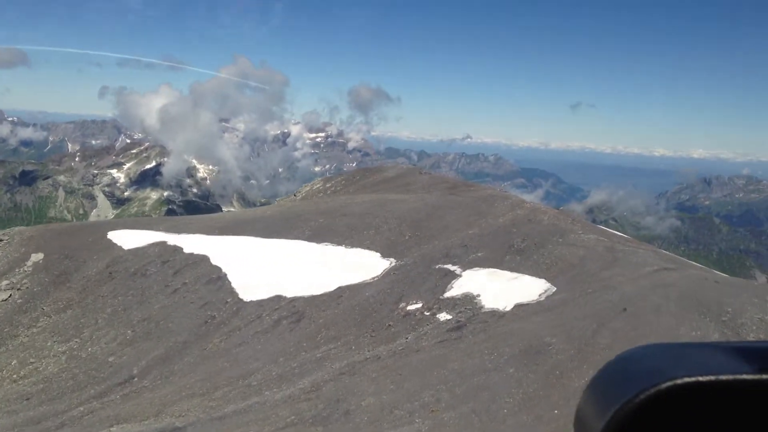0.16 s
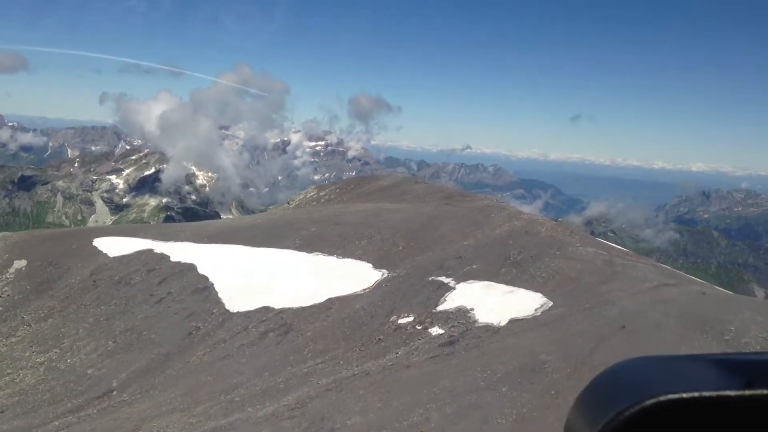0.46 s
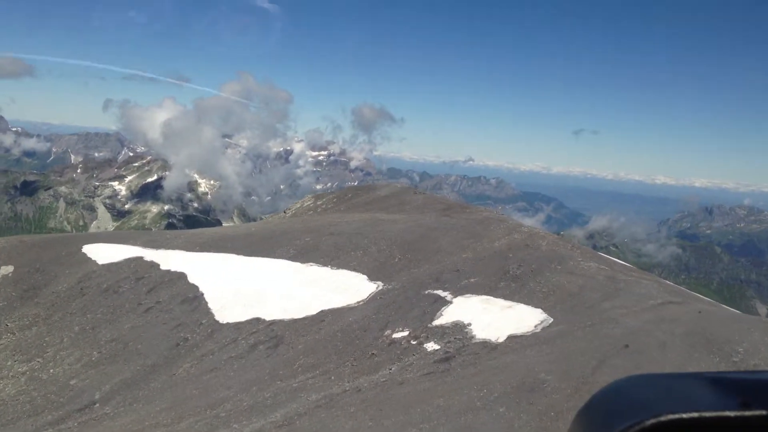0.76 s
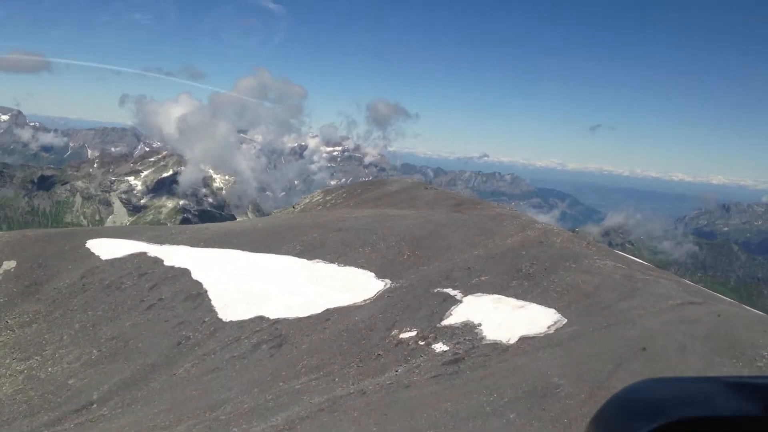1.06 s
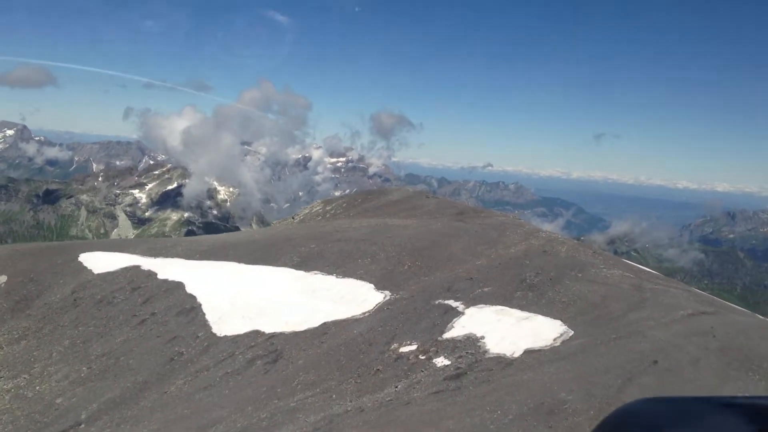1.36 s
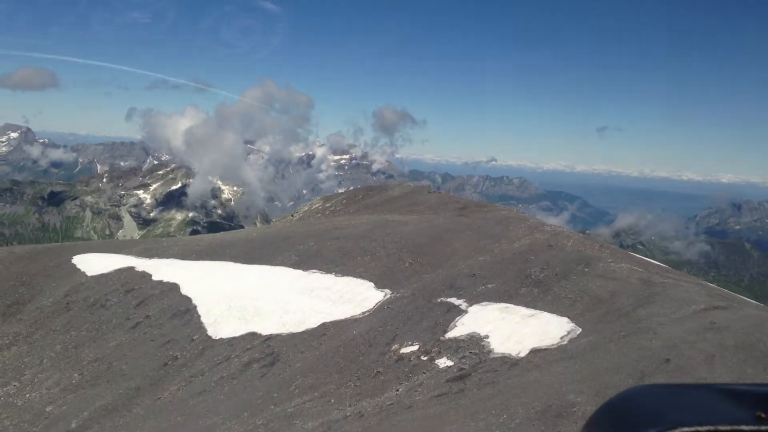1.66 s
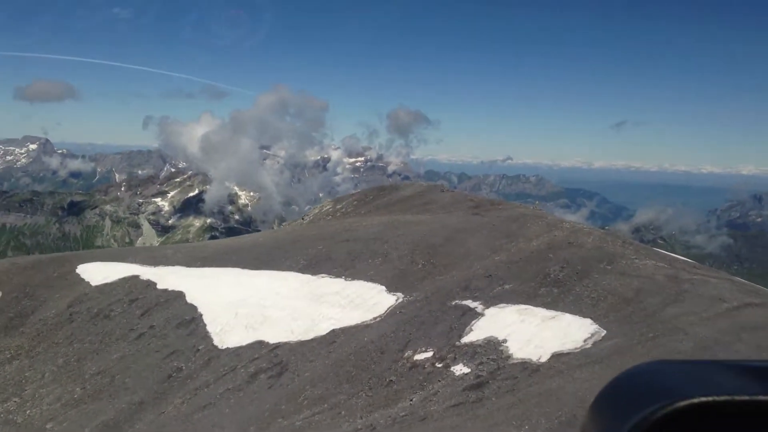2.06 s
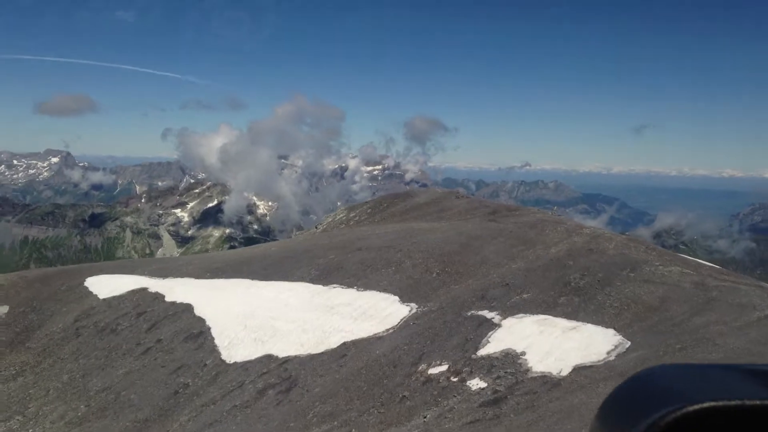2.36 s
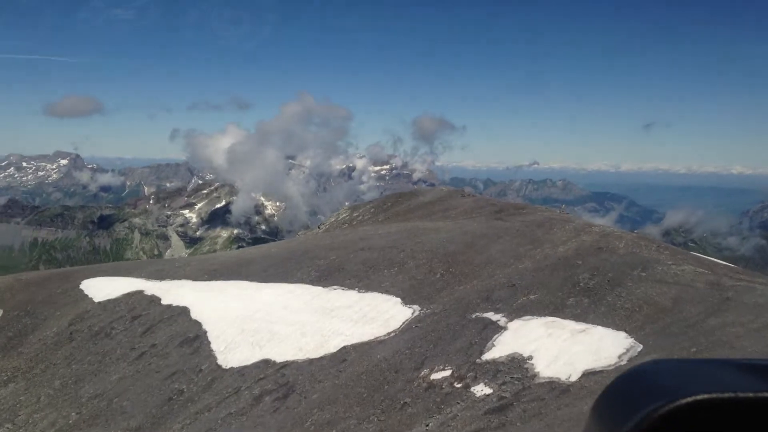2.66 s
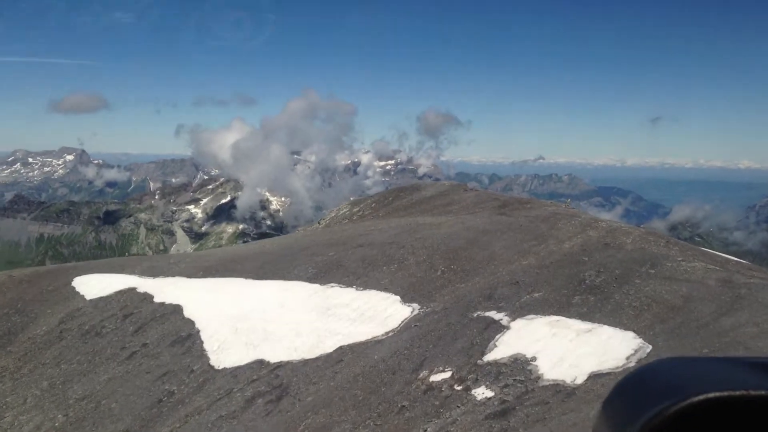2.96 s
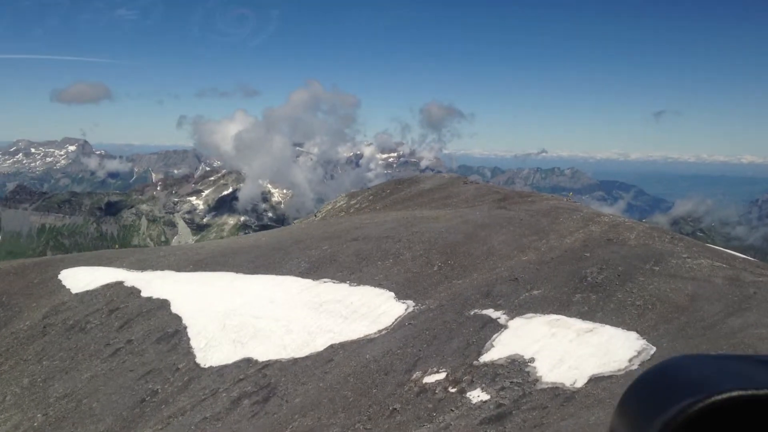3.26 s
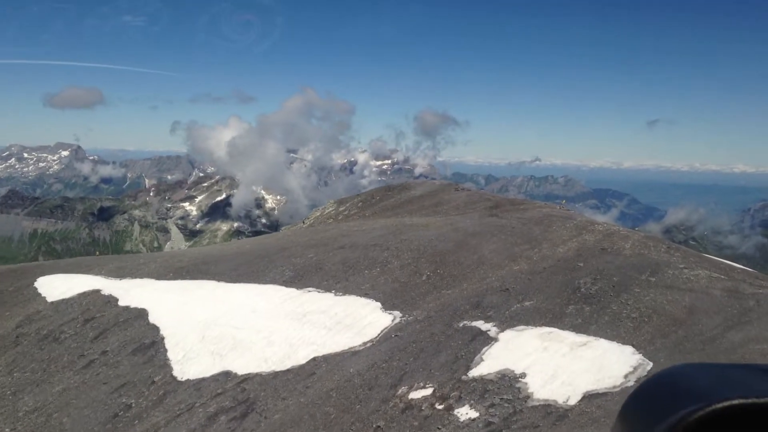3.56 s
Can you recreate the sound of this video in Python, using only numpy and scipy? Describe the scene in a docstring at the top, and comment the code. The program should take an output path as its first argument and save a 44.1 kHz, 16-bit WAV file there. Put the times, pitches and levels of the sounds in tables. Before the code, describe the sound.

Inside a flying helicopter: low engine drone, pulsing air rush and spells of chopping rotor slap

```python
"""Inside the cabin of a small piston helicopter in flight.
From the start the six-cylinder engine drones, gears whine faintly and the air rushes, swelling at every blade pass.
At once a first spell of blade slaps begins, about a second long: blades cut vortices and ring the cabin.
Dull thumps come now and then. From 1.9 s to 3 s a second spell of slaps builds quickly and fades;
its hardest slaps make the recorder duck, and drone and rush carry on to the end."""
import sys
import numpy as np
from scipy import signal
from scipy.io import wavfile
from scipy.ndimage import uniform_filter1d

SR = 44100
rng = np.random.default_rng(int(sys.argv[2]) if len(sys.argv) > 2 else 0)


def transcribe(u):
    """Save the signal u as a 16-bit wav file named by the first command-line argument.

    u: samples, shape (n,) or (channels, n), limited to [-1, 1]; the rate is SR.
    q: integer samples, one column per channel.
    """
    v = np.clip(np.atleast_2d(u).T, -1, 1)
    q = np.round(v * 32767).astype(np.int16)
    wavfile.write(sys.argv[1], SR, q)


N = 164493

# engine speed: (time [s], firing rate [firings per second])
FIRING_RATE = [(0, 136.05), (.8, 136.1), (1.2, 136.38), (2.15, 136.33), (2.4, 136.9), (3.0, 136.95),
               (3.25, 136.4), (3.73, 136.3)]
CYLINDERS = 6
# strength of the whole engine drone: (time [s], level [dB])
DRONE_LEVEL = [(0, -7), (.3, -0.9), (.6, 0), (1.0, -.5), (1.35, 0.5), (1.9, 1.5), (2.15, -2), (2.45, -4),
               (2.9, -2.5), (3.2, -2.5), (3.5, 1), (3.73, -0.8)]
# engine orders: (multiple of the four-stroke cycle rate, level before the drone curve [dB rms])
ENGINE_ORDERS = [(6, -17.5), (7, -31), (8, -23.5), (9, -25.5), (10, -26), (11, -36), (12, -30), (13, -39),
                 (15, -41), (16, -38.5), (17, -30), (18, -36.5), (21, -52), (27, -41.5), (28, -47),
                 (36, -53.5), (48, -44), (51, -48), (54, -50), (57, -57), (68, -56), (78, -55.5), (81, -66),
                 (102, -60), (108, -61)]
ORDER_SCATTER_RAD = 1  # how loosely the orders bunch in a cycle
FIRING_FLUTTER, ORDER_FLUTTER = 0.13, 0.25  # unsteadiness, relative to the tone
FLUTTER_HZ = 6.4
DRONE_CHOP_DB = 0.5  # the blades chop the drone slightly, this much either way

# gear whine: (frequency at mean engine speed [Hz], level before GEAR_LIFT_DB [dB rms])
GEAR_WHINES = [(5335, -72), (5545, -68), (6772, -71), (8210, -91), (8500, -84), (8619, -72)]
GEAR_LIFT_DB, GEAR_FLUTTER = 3, 0.4

BLADE_HZ, FIRST_SWISH_S = 13.62, 0.076
# colour of rushing air and machinery: (frequency [Hz], relative density [dB per Hz])
RUSH_SPECTRUM = [(25, -38), (60, -36), (100, -10), (150, -4.5), (200, -2.1), (260, -5.5), (330, -8.5),
                 (410, -7.5), (520, -14.5), (700, -16.5), (900, -20), (1150, -20), (1500, -28.5),
                 (2000, -29), (2500, -30.5), (4000, -36), (6500, -41.5), (8000, -43.5), (10000, -52.5),
                 (12500, -49.5), (15000, -57.5)]
RUSH_DB = -24.5  # rms before the level curve
# level of the rush: (time [s], level [dB])
RUSH_LEVEL = [(0, -2), (.4, -0.13), (.8, 0.4), (1.3, 1), (1.95, 3), (2.3, 0), (2.8, -0.4), (3.2, -0.9),
              (3.73, 0.7)]
# swell of the rush at each blade pass: (frequency [Hz], swing either way [dB])
BLADE_SWELL = [(100, 3.2), (300, 2.5), (700, 1), (2000, 1), (4500, 1.2), (8000, 2.5), (12000, 3)]

# blade slaps: (time [s], strength [dB], low-pass edge [Hz], extra level of side crossings and whop [dB])
BLADE_SLAPS = [(.058, 0, 940, -2.5), (.139, -5.5, 2180, -1), (0.214, -5.5, 2000, -5.5), (.281, 1, 890, -4),
               (0.349, 1.5, 970, -2.5), (.425, -4, 810, 4), (.502, -1.5, 780, 1.5), (.571, 0.5, 950, 0),
               (.646, 0, 844, -1), (.718, 3.5, 1000, -2.5), (0.793, -2, 880, 1), (0.869, -4.5, 830, 2),
               (.940, -2, 720, -2), (1.011, -1.5, 680, -3), (1.898, 2, 550, -2), (1.975, -0.5, 685, 4.5),
               (2.046, 1.5, 740, 3.5), (2.120, 4, 720, 2), (2.192, 9, 690, -14), (2.2698, 11.5, 2800, -7),
               (2.3429, 10, 3200, -9), (2.411, 7, 825, -4), (2.484, 5.5, 960, -3.5), (2.558, 3, 900, -3.5),
               (2.632, 1, 1000, -7.5), (2.703, -1, 970, -2.5), (2.777, -2, 950, -1.5),
               (2.850, 1, 950, -3.5), (2.921, -4, 900, 3.5), (2.996, 0, 880, -3)]
# vortices crossed just before and after the main one: (delay [ms], share of the main pulse [gain])
SIDE_CROSSINGS = [(-3.5, 0.54), (4, 0.6), (8, 0.83), (11.5, 0.45)]
CROSSING_JITTER_MS = 0.22
# cabin modes: (frequency [Hz], level [dB], ring time to -60 dB [s])
CABIN_MODES = [(208.3, -8, 0.12), (303.7, -14.5, 0.041), (419, -11.5, 0.047), (540, -29.5, 0.016),
               (675, -19.5, 0.035), (820, -15.5, 0.018), (1008, -15.5, 0.0075), (1176, -22.5, 0.017),
               (1530, -24.5, 0.017), (1744, -24.5, 0.014), (2460, -20.5, 0.003)]
SCATTER_DB, SCATTER_RISE_S = -27, 0.0026  # diffuse reflections of a slap
# falling body of a slap; the sweep's pitch varies around these from blade to blade
WHOP_DB, WHOP_START_HZ, WHOP_END_HZ = -21, 1000, 405.4
WHOP_S, WHOP_LEAD_S = 0.0288, 0.00584

# dull thumps: (time [s], level before the band filter [dB])
DULL_THUMPS = [(0.109, -15), (0.257, -15), (.665, -14.5), (1.196, -16), (1.232, -20), (1.328, -13),
               (1.888, -11), (2.192, -22), (3.329, -16), (3.428, -14), (3.692, -14)]
THUMP_HZ, THUMP_T60_S = 69.4, 0.028

# the recorder's gain control, overload and top cut
DUCK_ABOVE_DB, DUCK_RELEASE_DB_PER_S, DUCK_WINDOW_S = -7.5, 7.5, 0.008
CEILING, CUTOFF_HZ = 0.68, 15100


def from_db(db):
    """Decibels to gain."""
    return 10 ** (np.asarray(db) / 20)


def rms_one(x):
    """Scale to unit power."""
    return x / np.sqrt(np.mean(x ** 2) + 1e-20)


def in_time(rows):
    """Read a time curve at every sample."""
    return np.interp(np.arange(N) / SR, *np.transpose(rows))


def at_hz(points, hz):
    """Read a spectrum on a log-frequency axis."""
    f, value = np.transpose(points)
    return np.interp(np.log(hz), np.log(f), value)


def drift(rate_hz):
    """Slow random wander with spread 1: noise through two equal poles at rate_hz."""
    step = 40  # samples between drawn points
    pole = np.exp(-2 * np.pi * rate_hz * step / SR)
    noise = rng.standard_normal(N // step + 2002)
    slow = signal.lfilter([1], [1, -2 * pole, pole * pole], noise)[2000:]  # skip the settling
    return np.interp(np.arange(N) / step, np.arange(len(slow)), rms_one(slow))


def ring(t, hz, t60):
    """A dying sine that starts at t = 0."""
    return np.sin(2 * np.pi * hz * t) * np.exp(-np.log(1000) * t / t60)


def add(out, s, sound):
    """Mix a sound in at a time in seconds."""
    i = max(int(s * SR), 0)
    out[i:i + len(sound)] += sound[:max(N - i, 0)]


def tone(phase, flutter):
    """A line of unit power whose height and phase flutter."""
    in_step = (1 + flutter * drift(FLUTTER_HZ)) * np.cos(phase)
    quarter_turn = flutter * drift(FLUTTER_HZ) * np.sin(phase)
    return np.sqrt(2) * (in_step + quarter_turn) / np.sqrt(1 + 2 * flutter ** 2)


def blade_cycle():
    """+1 as a blade passes overhead, -1 between blades."""
    return np.cos(2 * np.pi * BLADE_HZ * (np.arange(N) / SR - FIRST_SWISH_S))


def engine(firing_phase):
    """A steady firing tone; unequal cylinders add orders that bunch into one throb per cycle."""
    out = 0
    for multiple, db in ENGINE_ORDERS:
        phase = multiple * firing_phase / CYLINDERS + ORDER_SCATTER_RAD * rng.standard_normal()
        flutter = FIRING_FLUTTER if multiple == CYLINDERS else ORDER_FLUTTER
        out = out - from_db(db) * tone(phase, flutter)
    return out * from_db(in_time(DRONE_LEVEL) + DRONE_CHOP_DB * blade_cycle())


def gears():
    """Thin whines that drift with the square root of the engine speed."""
    speed = in_time(FIRING_RATE)
    turn = 2 * np.pi * np.cumsum(np.sqrt(speed / speed.mean())) / SR
    return sum(from_db(db + GEAR_LIFT_DB) * tone(hz * turn, GEAR_FLUTTER) for hz, db in GEAR_WHINES)


def rush(patchy_db):
    """Third-octave bands of air and machine noise that swell with each blade and flicker on their own."""
    blade = blade_cycle()
    edges = 20 * 2 ** (np.arange(30) / 3)
    white = rng.standard_normal((2, N))
    out = 0
    for k, (low, high) in enumerate(zip(edges, edges[1:])):
        band_pass = signal.butter(2, [low, high], "band", fs=SR, output="sos")
        band = signal.sosfilt(band_pass, white[k % 2])  # neighbouring bands use separate noises
        hz = np.sqrt(low * high)
        swell_db = at_hz(BLADE_SWELL, hz) * blade
        out = out + band * from_db(at_hz(RUSH_SPECTRUM, hz) + swell_db + patchy_db * drift(21))
    return rms_one(out) * from_db(RUSH_DB + in_time(RUSH_LEVEL))


def whop(t):
    """A short falling sweep, a little different at each blade."""
    along = np.clip(t / WHOP_S, 0, 1)
    hz = WHOP_START_HZ * (WHOP_END_HZ / WHOP_START_HZ) ** np.sqrt(along)
    hz = hz * (1 + 0.0666 * rng.standard_normal())
    return from_db(WHOP_DB) * np.sin(np.pi * along) * np.sin(2 * np.pi * np.cumsum(hz) / SR)


def high_pass(x, edge_hz):
    """Steep cut of the bass."""
    return signal.sosfilt(signal.butter(4, edge_hz, "high", fs=SR, output="sos"), x)


def slaps():
    """A blade cuts a few vortices in quick succession; each pulse rings the cabin, brighter when the cut is close."""
    t, out = np.arange(SR // 8) / SR, np.zeros(N)
    cabin = sum(from_db(db) * ring(t, hz, t60) for hz, db, t60 in CABIN_MODES)
    scatter_shape = t / SCATTER_RISE_S * np.exp(1 - t / SCATTER_RISE_S)  # peaks at 1 after the rise
    for s, db, sharp_hz, side_db in BLADE_SLAPS:
        scatter = from_db(SCATTER_DB) * rng.standard_normal(len(t)) * scatter_shape
        dulling = signal.butter(4, sharp_hz, fs=SR, output="sos")
        pulse = from_db(db) * signal.sosfilt(dulling, cabin + scatter)
        add(out, s, pulse)
        add(out, s - WHOP_LEAD_S, from_db(db + side_db) * whop(t))
        for delay_ms, share in SIDE_CROSSINGS:
            delay_s = (delay_ms + CROSSING_JITTER_MS * rng.standard_normal()) / 1000
            add(out, s + delay_s, share * from_db(side_db) * pulse)
    return high_pass(out, edge_hz=164.6)


def thumps():
    """Short dull bumps under the drone, each a quickly dying low sine."""
    t, out = np.arange(SR // 8) / SR, np.zeros(N)
    for s, db in DULL_THUMPS:
        add(out, s, from_db(db) * ring(t, THUMP_HZ, THUMP_T60_S))
    return signal.sosfilt(signal.butter(2, [32, 220], "band", fs=SR, output="sos"), out)


def scene():
    """Everything as heard from a cabin seat, in one channel."""
    firing_phase = 2 * np.pi * np.cumsum(in_time(FIRING_RATE)) / SR
    mix = engine(firing_phase) + gears() + rush(patchy_db=1.0) + slaps() + thumps()
    return mix[None]


def record(dry):
    """Gain control ducks at once and recovers slowly; peaks are rounded and the top is cut."""
    window = int(DUCK_WINDOW_S * SR)
    power = np.abs(uniform_filter1d(dry[0] ** 2, window))
    over_db = np.maximum(10 * np.log10(power + 1e-12) - DUCK_ABOVE_DB, 0)
    # a running maximum against a rising ramp lets the ducking fall only at the release rate
    recovery = DUCK_RELEASE_DB_PER_S * np.arange(N) / SR
    duck_db = np.maximum.accumulate(over_db + recovery) - recovery
    x = dry * from_db(-uniform_filter1d(duck_db, window // 2))
    x = x / (1 + (x / CEILING) ** 8) ** (1 / 8)
    return signal.sosfilt(signal.ellip(12, 0.1, 90, CUTOFF_HZ, fs=SR, output="sos"), x)


dry = scene()
out = record(dry)
transcribe(out)
```